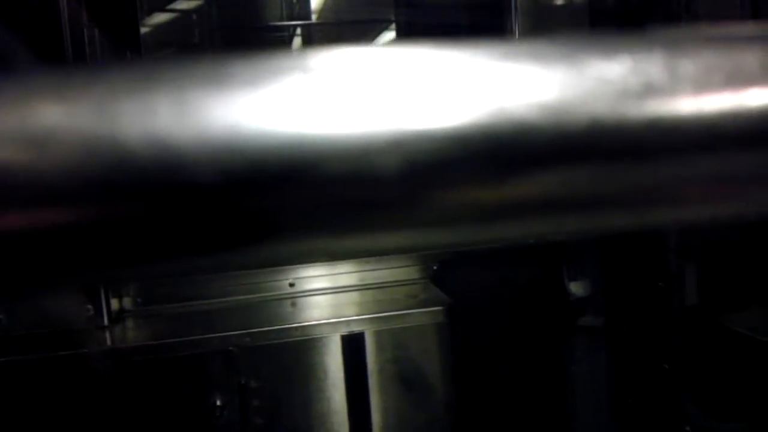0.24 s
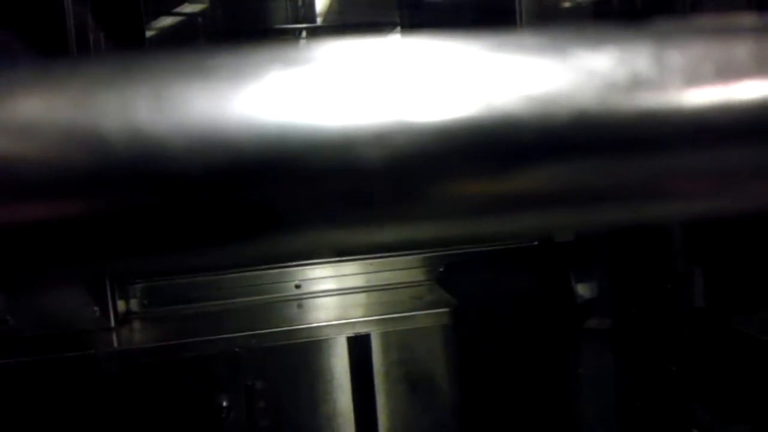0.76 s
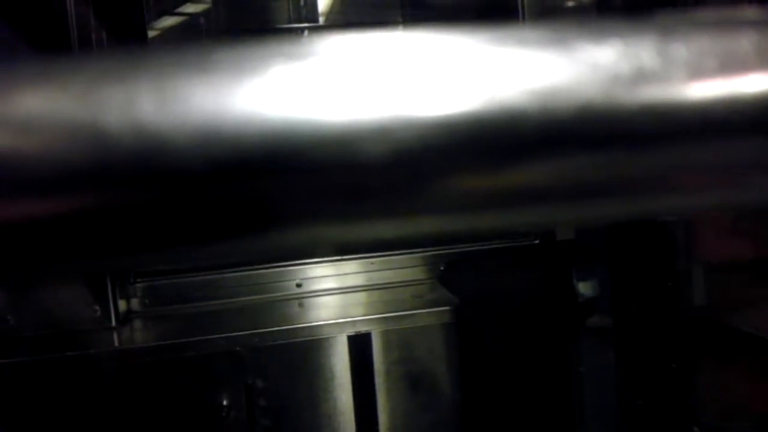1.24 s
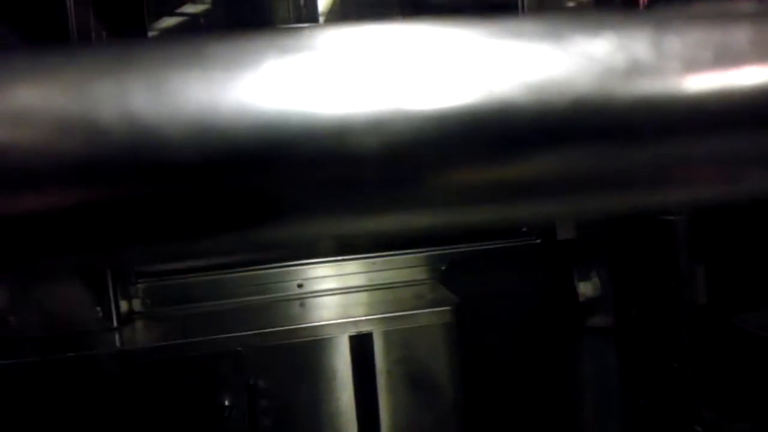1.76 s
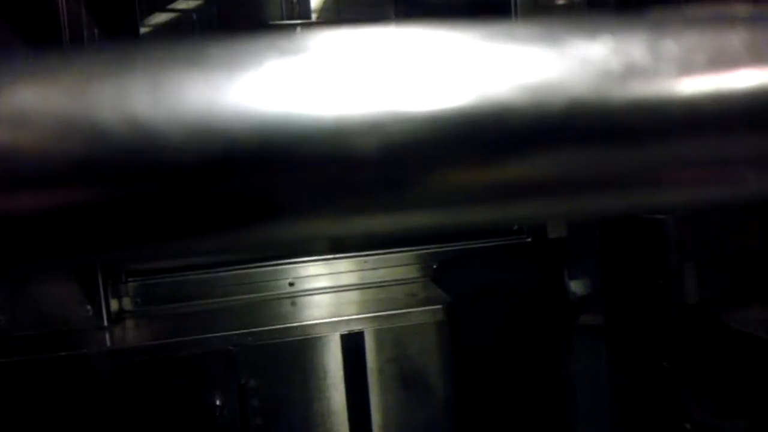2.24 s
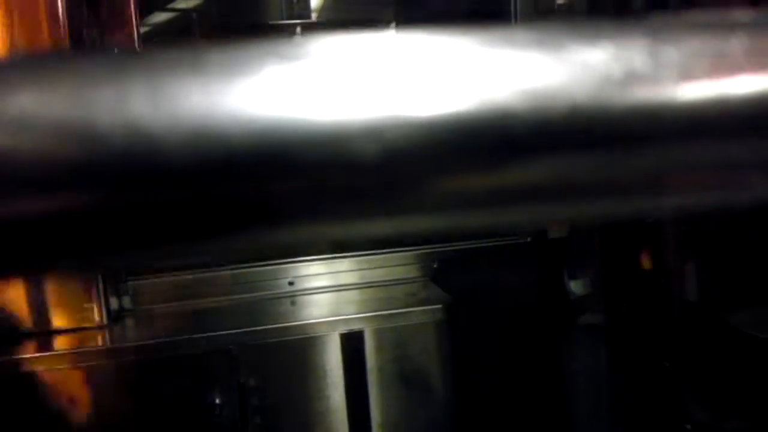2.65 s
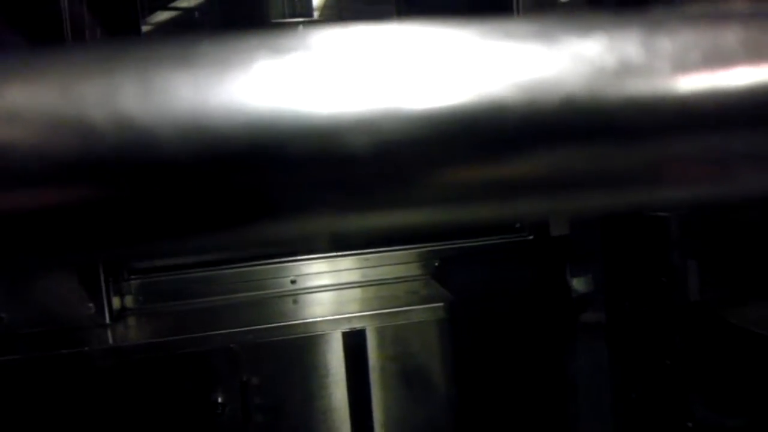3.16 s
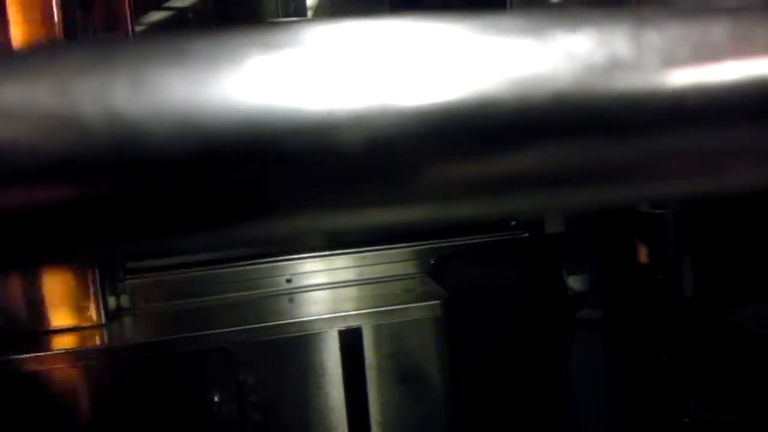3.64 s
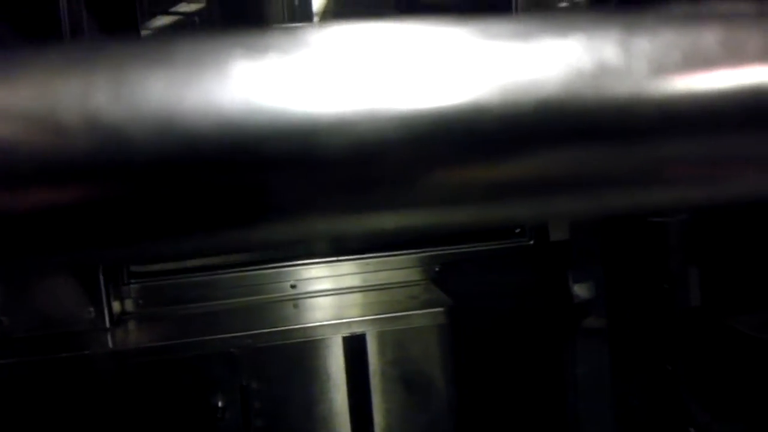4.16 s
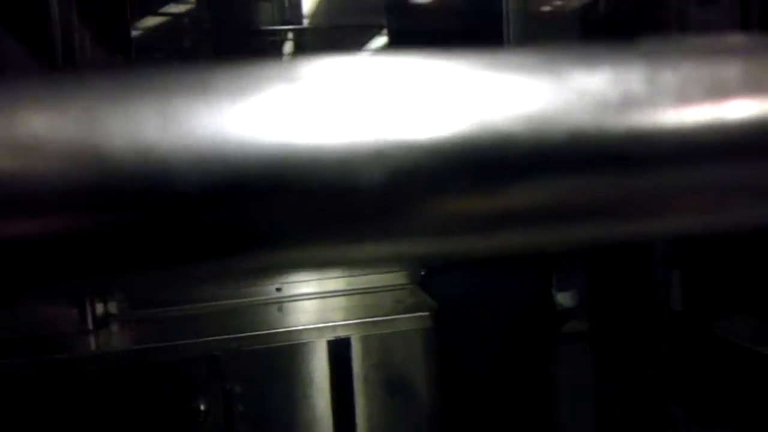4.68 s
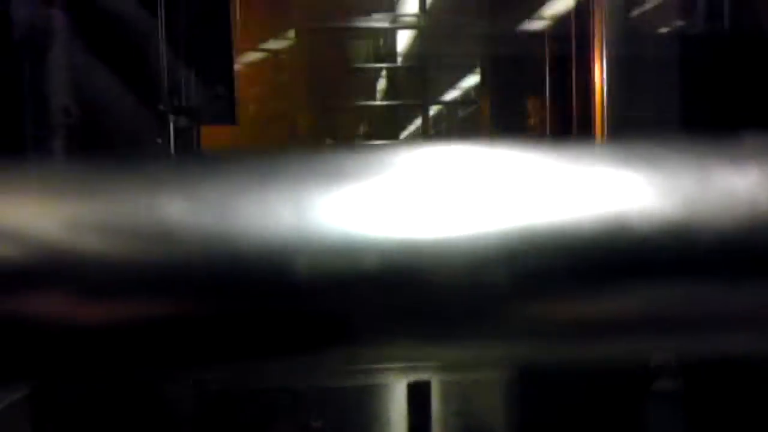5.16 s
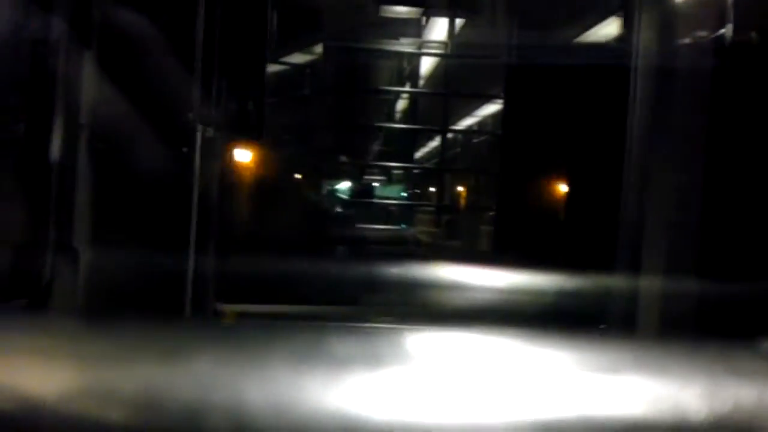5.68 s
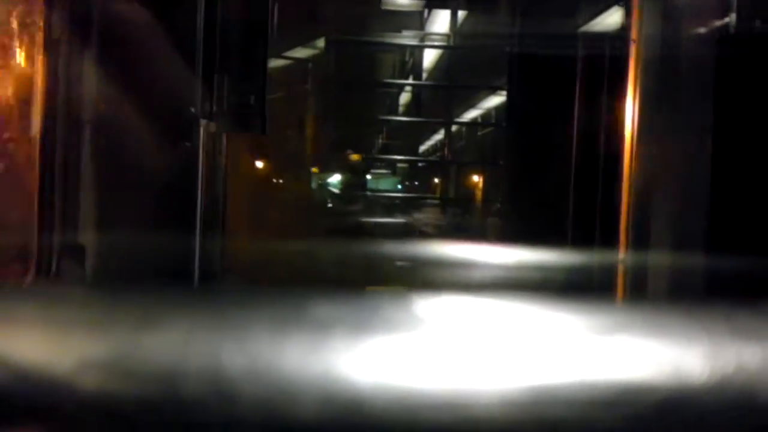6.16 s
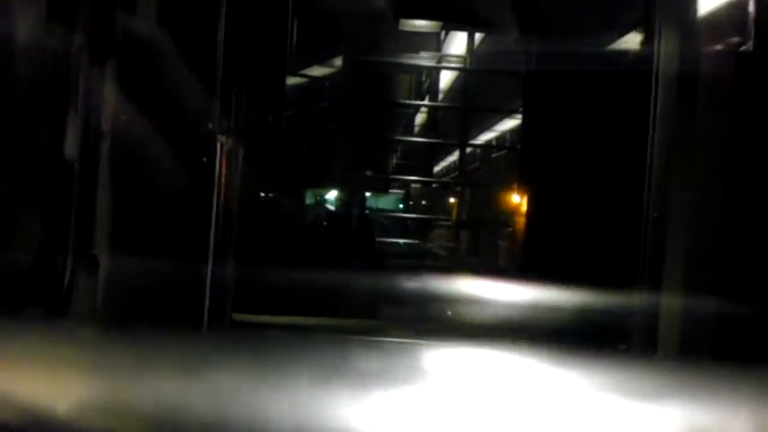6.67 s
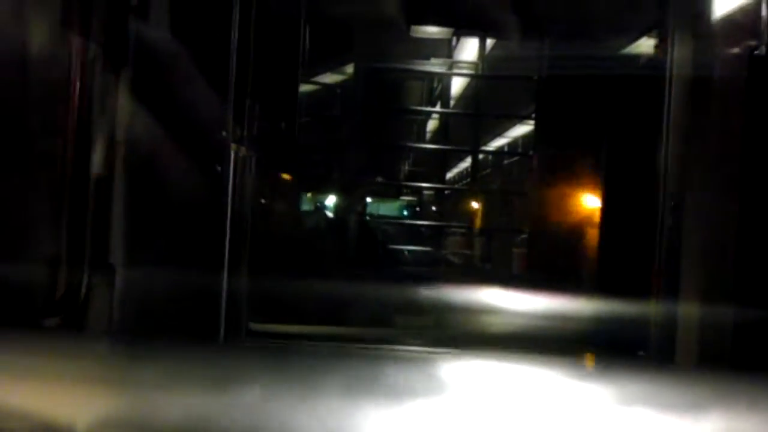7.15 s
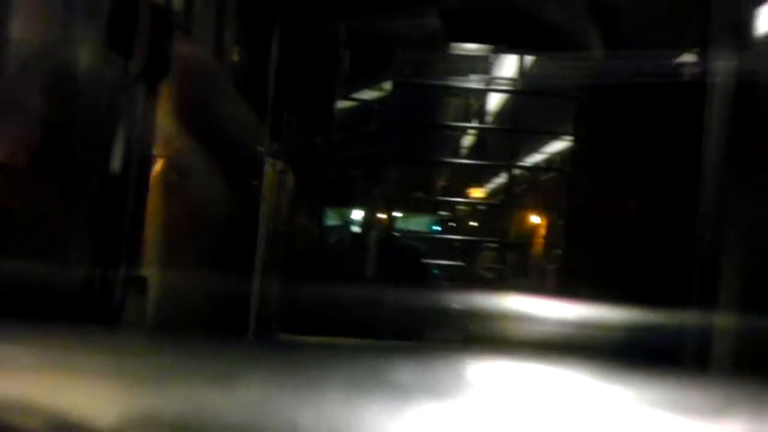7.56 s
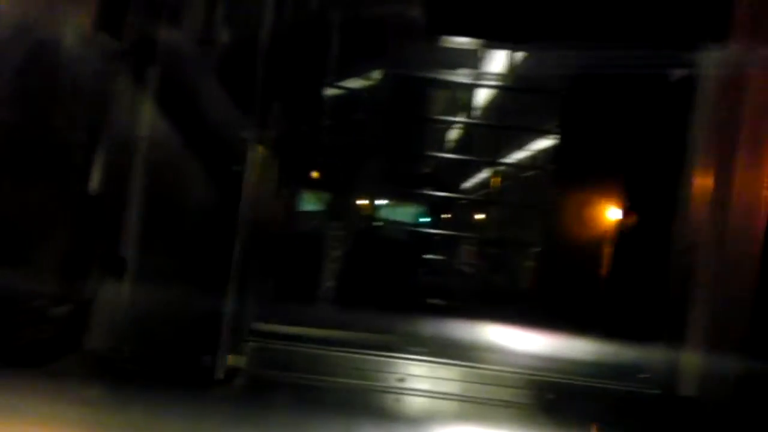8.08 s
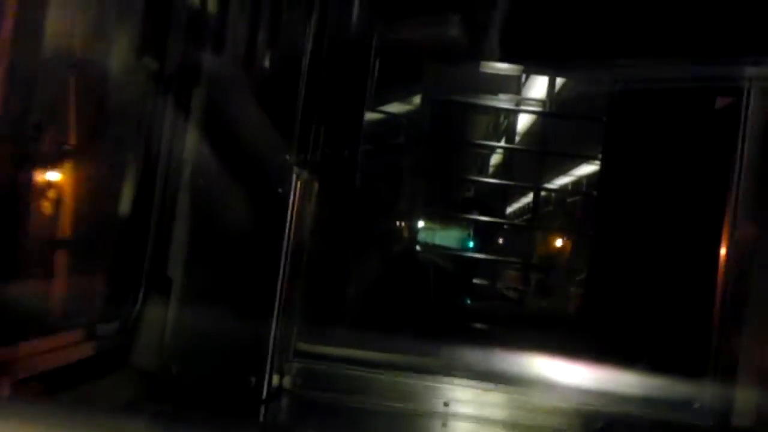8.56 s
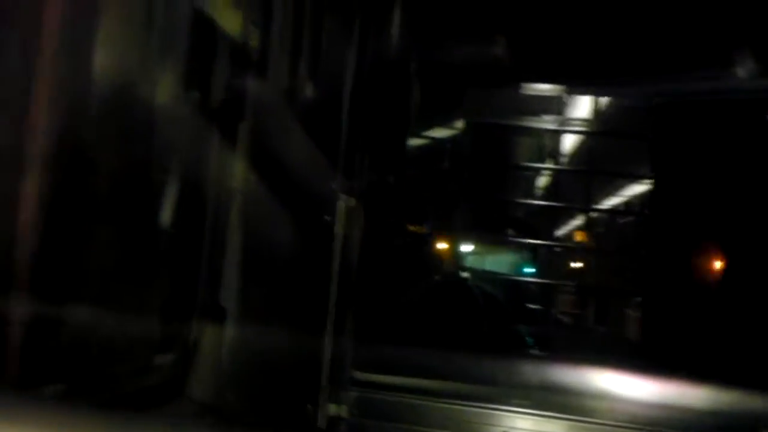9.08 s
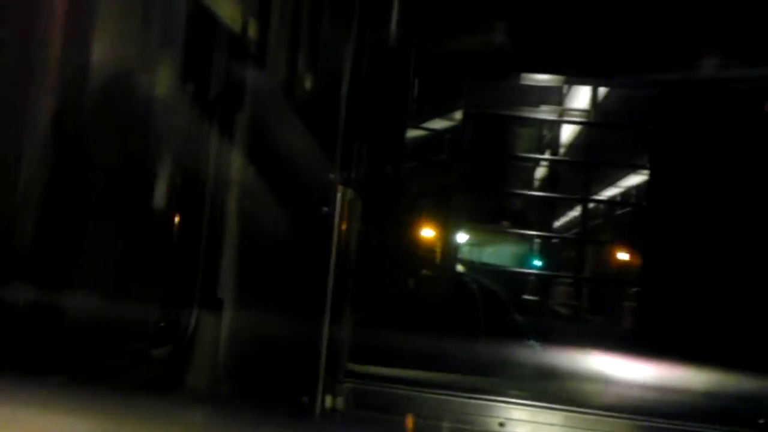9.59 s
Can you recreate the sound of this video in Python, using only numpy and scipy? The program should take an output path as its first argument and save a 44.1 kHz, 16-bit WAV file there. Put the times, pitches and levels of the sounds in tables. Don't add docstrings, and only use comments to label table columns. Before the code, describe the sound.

Heard from inside a subway car at speed in a tunnel. A loud continuous rumble of wheels, body boom and floor drone fills the space, swelling in dull thumps at rail joints. Air rushes and hisses through a leaking door close on the left, with quick bright puffs and a breathy, wavering high whistle. A few tiny ticks come midway. Stereo microphone near the door.

```python
import sys
import numpy as np
from scipy import signal
from scipy.fft import rfft, irfft
from scipy.io import wavfile
from scipy.ndimage import uniform_filter1d

SR = 44100
rng = np.random.default_rng(int(sys.argv[2]) if len(sys.argv) > 2 else 0)


def dump(signal):
    limited = np.clip(np.atleast_2d(signal).T, -1, 1)
    pcm = np.round(limited * 32767).astype(np.int16)
    wavfile.write(sys.argv[1], SR, pcm)


def decibels_to_gain(level_db):
    exponent = np.asarray(level_db, float) / 20
    return 10 ** exponent


N = 433497
COARSE = 40


def rms_one(x):
    return x / np.sqrt(np.mean(x ** 2) + 1e-20)


def in_time(rows):
    s, *columns = np.transpose(rows)
    return [np.interp(np.arange(N) / SR, s, column) for column in columns]


def at_hz(points, hz):
    table_hz, db = np.transpose(points)
    return np.interp(np.log(hz), np.log(table_hz), db)


def coarse_time():
    return np.arange(0, N + COARSE, COARSE) / SR


def stretched(coarse):
    return np.interp(np.arange(N) / COARSE, np.arange(len(coarse)), coarse)


def coarse_drift(rate_hz):
    r = np.exp(-2 * COARSE * np.pi * rate_hz / SR)
    white = rng.standard_normal(N // COARSE + 2002)
    settled = signal.lfilter([1], [1, -2 * r, r * r], white)[2000:]
    return rms_one(settled)


def drift(rate_hz):
    return stretched(coarse_drift(rate_hz))


def resonance(x, hz, width_hz):
    r = np.exp(-np.pi * width_hz / SR)
    feedback = [1, -2 * r * np.cos(2 * np.pi * hz / SR), r * r]
    return signal.lfilter(np.array([1, 0, -1]) * (1 - r * r) / 2, feedback, x)


# pitch in Hz, likeness from 0 to 1.
EAR_LIKENESS = [(60, 1), (110, 1.0), (190, 0.99), (340, 0.8), (610, 1), (1080, 0.069), (1930, 0.21),
                (3450, 0.24), (6150, 0.22), (11000, 0.03)]
# pitch in Hz, left minus right in dB.
EAR_LEAN = [(60, -2.5), (250, 2), (400, -1), (640, 1.5), (1030, 0), (1650, 2.5), (2300, 6.5), (3500, -2),
            (4300, 4.5), (4900, 6), (5500, 4.5), (6200, 2), (11000, 2)]


def to_ears(mid, side, hz):
    alike = np.clip(at_hz(EAR_LIKENESS, hz), 0, 1)
    ears = np.sqrt(1 + alike) * mid + np.sqrt(1 - alike) * side * [[1], [-1]]
    return ears * decibels_to_gain(at_hz(EAR_LEAN, hz) / 2 * np.array([[1], [-1]]))


def shaken(modes, patchy_db):
    out = 0
    white = rng.standard_normal((2, 2, N))
    for k, (hz, width_hz, level_db) in enumerate(modes):
        once = resonance(white[k % 2], hz, 1.3 * width_hz)
        mid, side = resonance(once, hz, 1.3 * width_hz)
        level = stretched(decibels_to_gain(level_db + patchy_db * coarse_drift(3.9)))
        out = out + level * to_ears(mid, side, hz)
    return rms_one(out)


def banded(spectrum, patchy_db, count):
    out = 0
    together = coarse_drift(3.3)
    edges_hz = np.geomspace(spectrum[0][0], spectrum[-1][0], count + 1)
    white = rng.standard_normal((2, 2, N))
    for k, (low, high) in enumerate(zip(edges_hz, edges_hz[1:])):
        band = signal.butter(2, [low, high], "band", fs=SR, output="sos")
        mid, side = signal.sosfilt(band, white[k % 2])
        hz = np.sqrt(low * high)
        flicker_db = patchy_db * (0.65 * together + coarse_drift(16))
        out = out + stretched(decibels_to_gain(at_hz(spectrum, hz) + flicker_db)) * to_ears(mid, side, hz)
    return rms_one(out)


# time in seconds, lift in dB.
RAIL_JOINTS = [(.02, 6.5), (.44, 6.5), (.85, 3.5), (1.31, 2), (1.9, 1), (2.85, 6.5), (3.38, 4.5),
               (4.33, 3.5), (5.02, 3), (5.5, 2), (5.86, 2), (7.02, 6.5), (7.5, 3), (8.53, 4.5), (8.97, 3.5),
               (9.55, -0.5), (9.82, 3)]


def joint_jolts_db():
    jolt_s, rebound_s, rebound_share = .05, .061, .27
    t, jolt_db = coarse_time(), 0
    for s, lift_db in RAIL_JOINTS:
        jolt = np.exp(-((t - s) / jolt_s) ** 2)
        sag = rebound_share * np.exp(-((t - s - rebound_s) / jolt_s) ** 2)
        jolt_db = jolt_db + lift_db * (jolt - sag)
    return stretched(jolt_db)


# pitch in Hz, level in dB per Hz.
ROAR_SPECTRUM = [(120, -29.5), (200, -4.5), (221, -9), (260, -0.5), (292, -7), (340, -1), (380, 1),
                 (726, 3.5), (897, 0.5), (1150, -6), (1270, -23), (1500, -24.5), (1950, -38.5),
                 (3300, -120)]


def tunnel_roar(jolt_db):
    return decibels_to_gain(-14.64 + 0.2 * jolt_db) * banded(ROAR_SPECTRUM, patchy_db=0.73, count=12)


# pitch in Hz, width in Hz, level in dB.
BODY_MODES = [(36, 23, -31.5), (57.4, 21, -19.5), (78.5, 33, -23.5), (102.6, 13, -8.5), (114.4, 20, -12.5),
              (137.2, 29.3, -4), (173.2, 21, 0), (205.5, 18, -10)]


def body_boom(shift_db, jolt_db):
    return decibels_to_gain(-24 - shift_db + jolt_db) * shaken(BODY_MODES, patchy_db=-0.35)


# pitch in Hz, width in Hz, level in dB.
FLOOR_MODES = [(259.3, 31, -1), (337, 24.2, 3), (428, 98, -4.5), (644.4, 49, -3), (731, 41, -11.5)]


def floor_drone(shift_db):
    return decibels_to_gain(-24.5 + 1.25 * shift_db) * shaken(FLOOR_MODES, patchy_db=0.0)


# time in seconds, shift in dB.
TRACK_SHIFT = [
    (0, 2),
    (1.0, -0.5),
    (2.4, 1),
    (3.6, -1.5),
    (4.6, 0.5),
    (5.8, 1),
    (7.6, 1.5),
    (8.5, 4),
    (9.83, 3),
]


def running_gear():
    shift_db, = in_time(TRACK_SHIFT)
    jolt_db = joint_jolts_db()
    return tunnel_roar(jolt_db) + body_boom(shift_db, jolt_db) + floor_drone(shift_db)


# time in seconds, level in dB.
DRIVE_LEVEL = [
    (5.44, -90),
    (5.5, -56),
    (7.0, -56),
    (7.06, -90),
]


def drive_electronics():
    line_db, = in_time(DRIVE_LEVEL)
    tone = np.sin(2 * np.pi * 9000.5 * np.arange(N) / SR)
    line = decibels_to_gain(line_db + drift(8)) * (line_db > -89) * tone
    return line * decibels_to_gain(np.array([[0], [-11.]]))


# time in seconds, peak in dB, pitch in Hz.
FITTING_TICKS = [
    (4.954, -29, 6000),
    (5.429, -25.5, 6000),
    (5.917, -27, 5900),
]


def loose_fitting():
    t, out = np.arange(N) / SR, np.zeros(N)
    for s, peak_db, hz in FITTING_TICKS:
        out += decibels_to_gain(peak_db) * np.exp(-((t - s) / .0013) ** 2) * np.sin(2 * np.pi * hz * t)
    return out * decibels_to_gain(np.array([[0], [-11.]]))


# start in seconds, length in seconds, pitch in Hz,
# lift in dB.
DOOR_SWAYS = [(-.2, 1.18, 2148, 9), (1.58, .27, 2160, 8), (1.97, .06, 2185, 3), (3.0, .35, 2190, 4),
              (3.35, .44, 2146, 10), (4.33, .3, 2146, 4), (6.11, .15, 2140, 14), (6.28, .2, 2175, 7),
              (6.86, .07, 2148, 8), (7.48, .08, 2190, 4), (7.92, .55, 2170, 6), (3.97, .12, 2285, 1),
              (6.66, .12, 2285, 4), (9.5, .2, 2280, 3)]
# time in seconds, level in dB.
WHISTLE_LEVEL = [(0, -39), (.5, -42), (.7, -37), (1.1, -42), (1.5, -37), (2.1, -43), (2.72, -35),
                 (3.1, -41), (4.1, -42), (4.9, -41), (5.25, -34), (5.4, -44), (5.8, -39), (6.5, -44),
                 (7.1, -35), (7.7, -43), (8.65, -38), (9.0, -47)]


def whistle_course():
    rest_hz, drop_s, return_s = 2250, .05, .1
    t = coarse_time()
    hz, lift_db = rest_hz + 0 * t, 0 * t
    for s, length_s, low_hz, sway_db in DOOR_SWAYS:
        opening = (t - s) / drop_s
        closing = 1 - (t - s - length_s) / return_s
        wide = np.clip(np.minimum(opening, closing), 0, 1)
        hz = hz + wide * (low_hz - hz)
        lift_db = lift_db + wide * (sway_db - lift_db)
    level_db, = in_time(WHISTLE_LEVEL)
    return stretched(hz) + 13 * drift(7), level_db + stretched(lift_db) + 2.5 * drift(15)


# pitch in Hz, width in Hz, gain in dB.
PANEL_MODES = [(2137, 12, 2), (2192, 14, 0), (2252, 12, 3)]


def whistle():
    hz, level_db = whistle_course()
    wobble_hz, breath_hz, lock_hz = 11, 45, 25
    held_hz = hz + wobble_hz * drift(20)
    for mode_hz, _, _ in PANEL_MODES[::2]:
        held_hz = held_hz + .6 * (mode_hz - held_hz) * np.exp(-((held_hz - mode_hz) / lock_hz) ** 2)
    core = decibels_to_gain(level_db + 1.5 * drift(14)) * np.sin(2 * np.pi * np.cumsum(held_hz) / SR)
    breathy_hz = hz + breath_hz * drift(42.5)
    skirt = decibels_to_gain(level_db + 0.65 * drift(30)) * np.sin(2 * np.pi * np.cumsum(breathy_hz) / SR)
    rung = 0
    for k, (mode_hz, width_hz, gain_db) in enumerate(PANEL_MODES):
        rung = rung + (-1) ** k * decibels_to_gain(gain_db) * resonance(core + skirt, mode_hz, width_hz)
    left = decibels_to_gain(3) * (.8 * core + .5 * skirt + np.roll(rung, 5))
    right = decibels_to_gain(-4) * np.roll(core + 1.5 * skirt + .2 * rung, 40)
    return np.array([left, right])


# time in seconds, peak in dB, length in seconds.
FIXTURE_PUFFS = [(.309, -52, 0.13), (0.458, -46, 0.07), (0.62, -51, .053), (0.89, -55, .031),
                 (1.39, -44, 0.13), (1.586, -53.5, .04), (1.884, -47.5, 0.042), (2.117, -49.5, 0.029),
                 (2.583, -57, 0.05), (2.705, -52, .082), (2.903, -42.5, 0.1), (3.3, -52.5, .035),
                 (3.444, -53, .037), (3.554, -42.5, 0.071), (3.73, -40, 0.053), (3.898, -40.5, .059),
                 (4.05, -40, 0.046), (4.311, -41, 0.04), (4.42, -47, .051), (4.744, -50, .045),
                 (5.043, -47.5, .064), (9.46, -54, .06), (5.677, -52.5, .044), (9.053, -55, .06),
                 (8.4, -54, .04), (6.823, -51, .05), (6.942, -45, 0.049), (7.767, -48, 0.084),
                 (8.022, -57, .046), (8.736, -47, 0.069)]
# pitch in Hz, level in dB per Hz.
PUFF_SPECTRUM = [(4500, -1.5), (6000, 11), (7500, 3.5), (9000, 3.5), (10000, -11), (11800, -6.5)]


def fixture_puffs():
    gap_s, small_db, spread_db, small_s = 0.14, -58.5, 7.5, 0.039
    chance = rng.standard_normal((70, 2))
    small = [((k + .3 * a) * gap_s, small_db + spread_db * b, small_s) for k, (a, b) in enumerate(chance)]
    small = small[1:int(N / SR / gap_s) - 1]
    t, swell = np.arange(N) / SR, np.zeros(N)
    for s, peak_db, length_s in list(FIXTURE_PUFFS) + small:
        near = slice(max(int((s - 2 * length_s) * SR), 0), int((s + 2 * length_s) * SR))
        swell[near] += decibels_to_gain(peak_db) * np.exp(-((t[near] - s) / (0.61 * length_s)) ** 2)
    return decibels_to_gain(-0.5) * swell * banded(PUFF_SPECTRUM, patchy_db=0.1, count=4)


# time in seconds, flow in dB, brightness in dB.
GAP_FLOW = [(0, -24.5, 2), (.2, -26, 1), (.55, -23, 1.5), (1.0, -27, 0.5), (1.38, -25, 3), (1.65, -26, 0),
            (2.3, -26.5, -0.5), (2.8, -25.5, 0), (3.2, -25.5, -0.5), (4.0, -25.5, 2.5), (4.38, -21.5, -3),
            (4.6, -25.5, 1), (5.35, -24, -0.5), (5.9, -27, 0), (7.5, -26, 0.5), (7.8, -27, 2.5),
            (8.2, -27.5, 0), (9.83, -26.5, 0)]
# pitch in Hz, level in dB per Hz.
RUSH_SPECTRUM = [(1200, 1), (1400, -8.5), (1900, -7), (2300, -6.5), (2700, -9.5), (3000, -13.5),
                 (3400, -16.5), (4000, -16), (4400, -15.5), (4800, -31)]
# pitch in Hz, level in dB per Hz.
HISS_SPECTRUM = [(4500, -6.5), (5000, -4), (5500, 3), (6000, 0), (6600, -8), (7300, -11), (8500, -11),
                 (10000, -14), (11800, -12.5)]


def door_air():
    flow_db, bright_db = in_time(GAP_FLOW)
    hiss_db = flow_db - 20 + bright_db + 1.2 * drift(2.7)
    rush = decibels_to_gain(flow_db - 3.0) * banded(RUSH_SPECTRUM, patchy_db=0.87, count=10)
    hiss = decibels_to_gain(hiss_db) * banded(HISS_SPECTRUM, patchy_db=0.95, count=8)
    return rush + hiss + fixture_puffs()


def coloured(x, modes):
    return x + sum(decibels_to_gain(gain_db) * resonance(x, hz, width_hz) for hz, width_hz, gain_db in modes)


# pitch in Hz, width in Hz, gain in dB.
DOORWAY_MODES = [(1690, 88, 0), (2050, 37, -15.5)]
# pitch in Hz, width in Hz, gain in dB.
AISLE_MODES = [(1505, 27, -1), (1653, 100, 2.5), (1720, 32, -10.5)]


def door_air_at_ears():
    echo_s, echo_db, shadow_hz = .00495, -11.5, 5250
    left, right = door_air()
    left = coloured(left, DOORWAY_MODES)
    left = left + decibels_to_gain(echo_db) * np.roll(left, round(echo_s * SR))
    shade = signal.butter(3, shadow_hz, fs=SR, output="sos")
    right = signal.sosfiltfilt(shade, coloured(right, AISLE_MODES))
    return np.array([left, right])


def scene():
    return running_gear() + drive_electronics() + loose_fitting() + whistle() + door_air_at_ears()


# pitch in Hz, level in dB per Hz.
MUTE_THRESHOLD = [(4000, -86), (5000, -85), (7000, -86), (9300, -88), (11500, -86)]
TREBLE_EDGES = [196, 216, 240, 264, 292, 320, 352, 384, 416, 448, 480, 512, 544, 1025]


def mute_quiet_bands(x):
    frame, frame_start = 1024, 790
    round_off_db, thin_out_db, thin_out_hz = -6, -5, 5100
    line_hz = SR / (2 * frame)
    window = signal.windows.kaiser_bessel_derived(2 * frame, 4 * np.pi)
    lead = 2 * frame - frame_start
    padded = np.pad(x, ((0, 0), (lead, 2 * frame + (-N - lead) % frame)), "reflect")
    halves = padded.reshape(2, -1, frame)
    spectra = rfft(np.concatenate([halves[:, :-1], halves[:, 1:]], axis=2) * window)
    for low, high in zip(TREBLE_EDGES, TREBLE_EDGES[1:]):
        per_hz = abs(spectra[..., low:high]) ** 2 * 2 / (SR * frame)
        band = per_hz.mean(axis=2, keepdims=True)
        limit = decibels_to_gain(at_hz(MUTE_THRESHOLD, (low + high) / 2 * line_hz)) ** 2
        waver = decibels_to_gain(2.5 * rng.standard_normal(band.shape))
        heard = band > limit * waver
        thin = (low * line_hz > thin_out_hz) * decibels_to_gain(thin_out_db) ** 2 * uniform_filter1d(band, size=3, axis=1)
        strong = uniform_filter1d(per_hz, size=3, axis=2) > thin
        spectra[..., low:high] *= strong & heard & (per_hz > limit * decibels_to_gain(round_off_db) ** 2)
    frames = irfft(spectra) * window
    joined = frames[:, 1:, :frame] + frames[:, :-1, frame:]
    return joined.reshape(2, -1)[:, lead - frame:lead - frame + N]


def low_pass(x):
    return signal.sosfilt(signal.butter(12, 11570, fs=SR, output="sos"), x)


def record(dry):
    rounded = 1.52 * np.tanh(dry / 1.654)
    fade = np.minimum((N - np.arange(N)) / 150, 1)
    return low_pass(fade * mute_quiet_bands(rounded))


dry = scene()
out = record(dry)
dump(out)
```